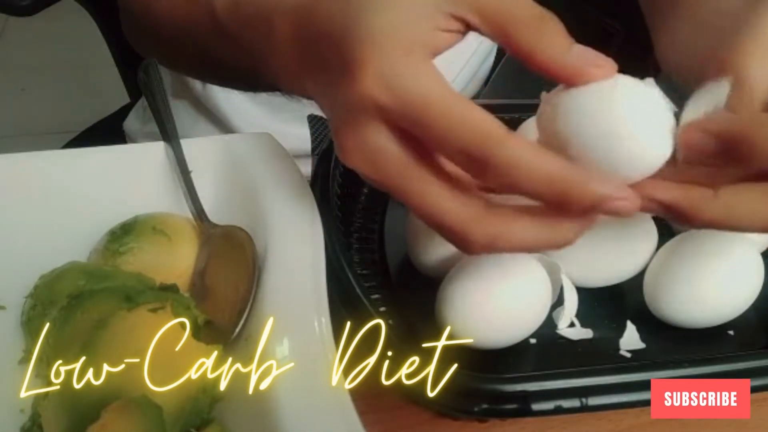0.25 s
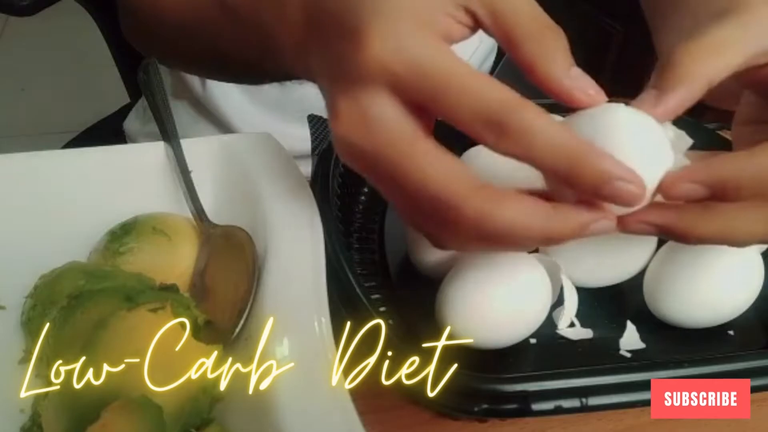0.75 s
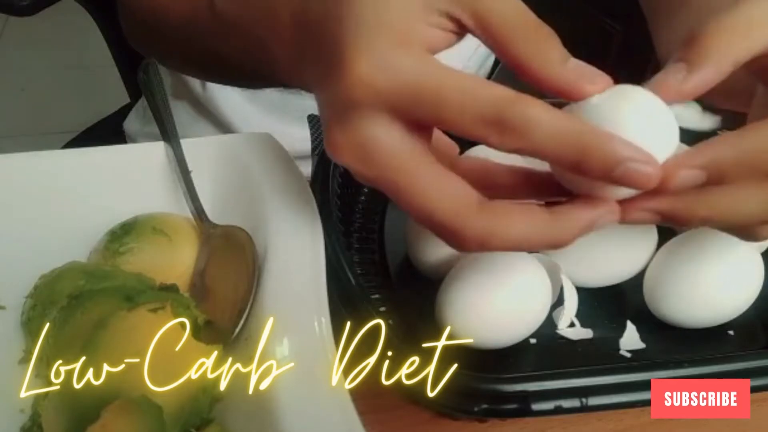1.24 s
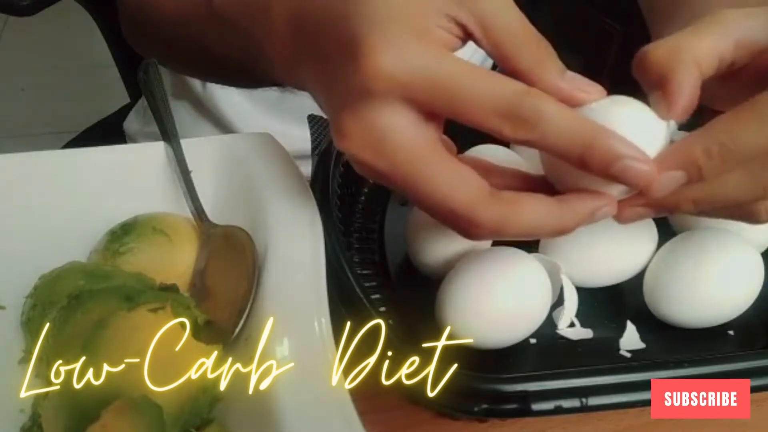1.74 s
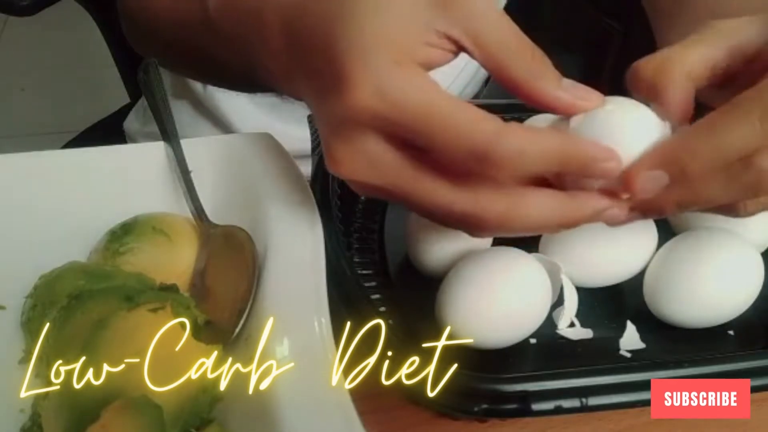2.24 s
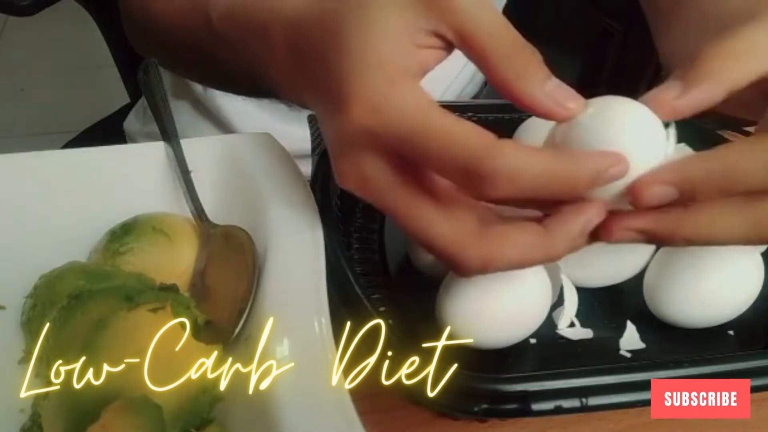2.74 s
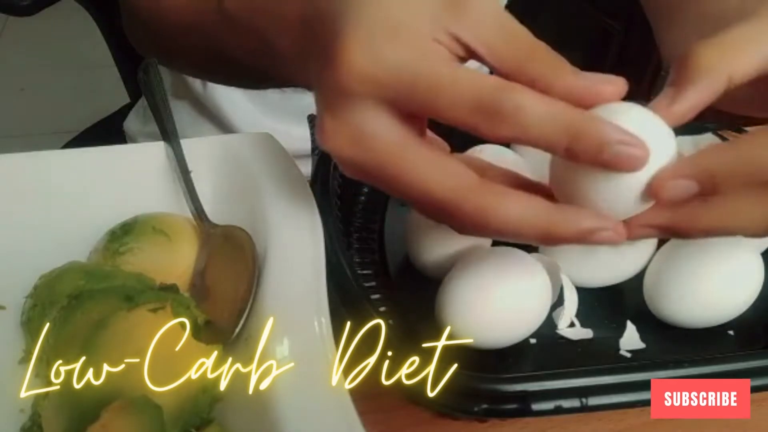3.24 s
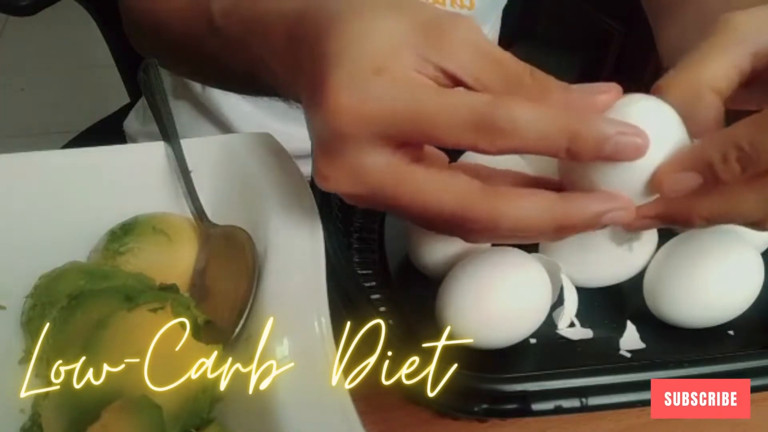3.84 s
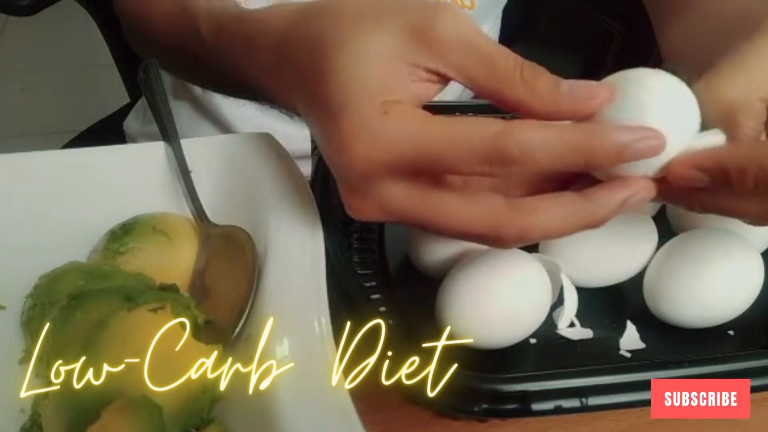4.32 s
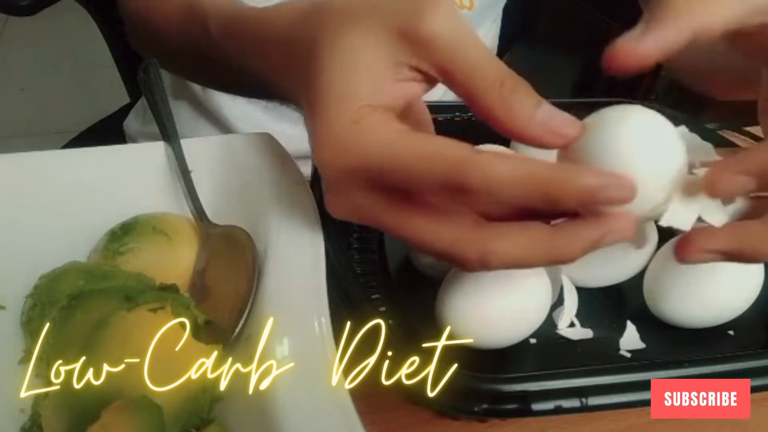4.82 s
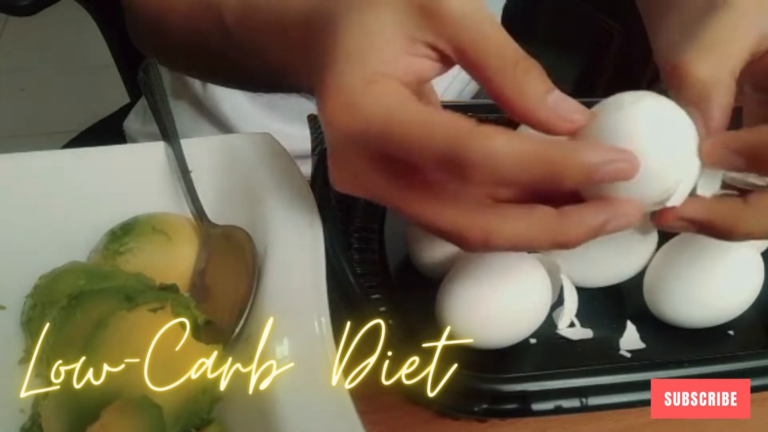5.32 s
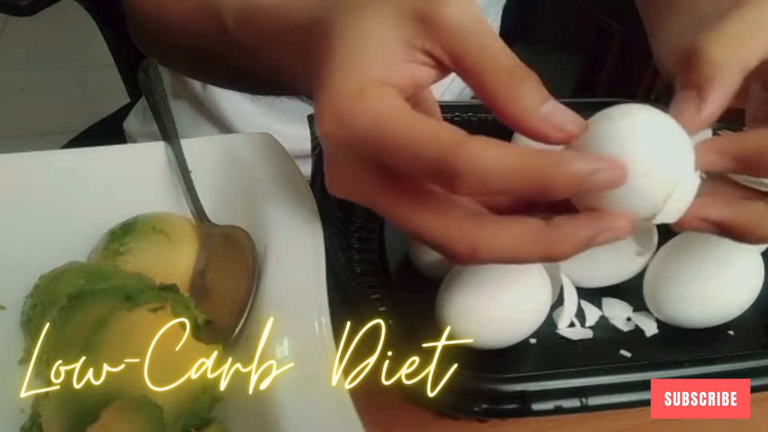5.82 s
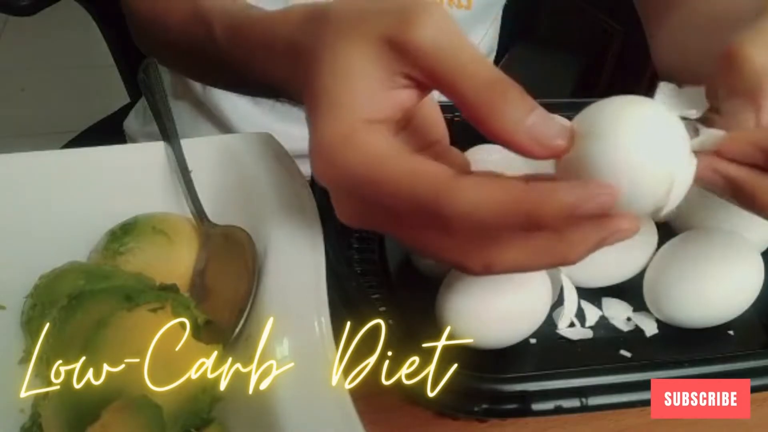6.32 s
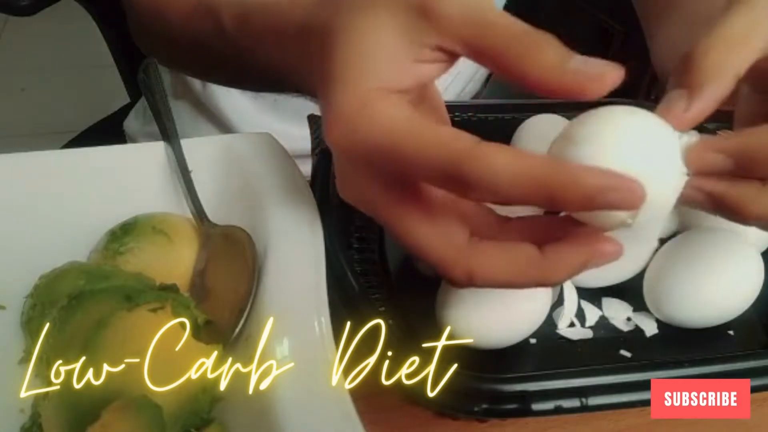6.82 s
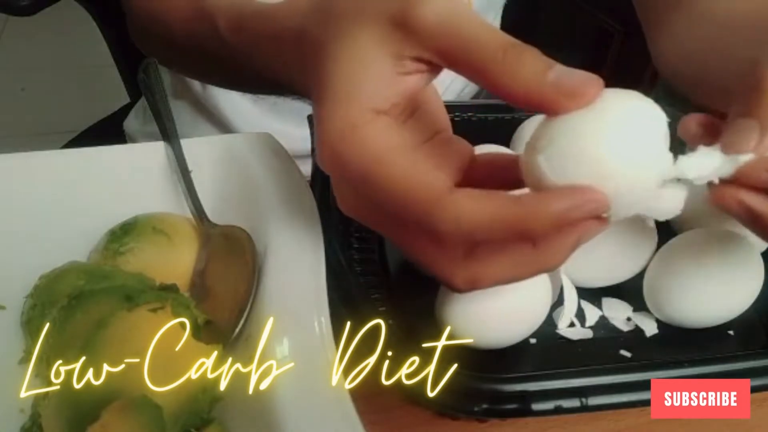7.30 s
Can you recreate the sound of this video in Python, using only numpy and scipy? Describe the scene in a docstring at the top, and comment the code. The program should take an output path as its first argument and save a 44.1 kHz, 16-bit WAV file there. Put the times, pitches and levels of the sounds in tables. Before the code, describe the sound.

Brittle eggshell snaps and tiny tearing crackles close up over a low room hum, with two bouncing clatters of shell pieces on a plastic tray.

```python
"""Fine snaps and crackles come first, over a low hum: fingers peel a hard-boiled egg close to a phone.
Noise bursts ring the shell for each snap; dense tiny clicks make the tearing, the rips and soft rubbing.
Twice a handful of pieces drops and bounces on a plastic tray: short hollow knocks, shell ticks and crumbs.
Shaped noise makes the air and the wavering rumble of the small room, and two thin tones whine in the hum."""
import sys
import numpy as np
from scipy import signal
from scipy.fft import rfft, irfft
from scipy.io import wavfile
from scipy.ndimage import uniform_filter1d

SR = 44100
rng = np.random.default_rng(int(sys.argv[2]) if len(sys.argv) > 2 else 0)


def persist_wave(psi):
    """Save psi, clipped to +-1, as 16-bit WAV."""
    counts = np.round(np.clip(psi, -1, 1) * 32767).astype(np.int16)
    wavfile.write(sys.argv[1], SR, np.atleast_2d(counts).T)


N = 333396  # length [samples]

# shell snaps; deeper fractures sound duller: (time [s], level [dB], depth [dB])
SNAPS = [(0.105, -59, -6), (0.2886, -53, -12), (0.307, -50.5, -9), (0.3414, -49, 2), (0.3485, -44.5, 0),
         (0.5097, -55.5, 5), (0.751, -37.5, 13.5), (0.7956, -46.5, 10.5), (0.851, -56, 8),
         (0.9437, -48.5, 7), (1.126, -52, 5), (1.263, -57, -6), (1.3274, -61, -4), (1.5805, -48, -2),
         (1.6245, -39.5, 6), (1.6331, -34.5, -3.5), (1.7638, -50.5, 16), (2.2968, -58.5, 10.5),
         (2.3261, -57, 5), (2.4717, -58.5, 10), (2.832, -46, -10), (2.8812, -33, -2), (2.9053, -42, -10),
         (2.9452, -41, -12), (3.0764, -29.5, -1.5), (3.0907, -33, -6), (3.1024, -43, -2),
         (3.1108, -30.5, 0.5), (3.1223, -39.5, -1), (3.139, -44, -4), (3.2345, -56, 4), (3.316, -39, 4),
         (3.5156, -46.5, 1), (3.6566, -53.5, 12), (3.7658, -49, 5), (3.7794, -50, -5), (3.8202, -52.5, 7),
         (3.838, -51.5, -1), (3.8788, -54, 6), (3.8904, -54, 8), (3.922, -54, 7.5), (3.9888, -48.5, -8),
         (4.0018, -50.5, -2), (4.0258, -49.5, 9), (4.1609, -58.5, -5), (4.25, -46, -8), (4.4924, -51, 1),
         (4.5491, -52.5, 7), (4.6159, -57, 3), (5.2225, -55.5, 0), (5.2753, -53, -1), (5.311, -54.5, 0),
         (5.3877, -62, 3), (5.451, -59, 6), (5.686, -56, 2.5), (5.7533, -60, 2), (5.8593, -52.5, -4),
         (5.9389, -54, -5), (6.201, -56, -2), (6.304, -51, 6.5), (6.3716, -53, -4), (6.4243, -58.5, 4),
         (6.4484, -54.5, 6), (6.8678, -56.5, -2)]
# pieces landing on the tray: (time [s], level [dB], knock pitch [Hz], brittle tick against knock [dB])
DROPS = [(4.9028, -12.5, 1730, -11), (4.906, -12, 1720, -16), (4.924, -9.5, 2260, -19),
         (4.929, -7, 1670, -11), (4.941, -16.5, 2580, -9), (4.946, -25, 2330, -8),
         (4.964, -26.5, 2220, -1.5), (4.972, -28, 2250, -12), (4.979, -29, 2430, -12.5),
         (5, -41.5, 2430, 5), (5.013, -25.5, 2260, -14), (5.016, -29, 2220, -2), (5.025, -30.5, 2340, -22),
         (7.127, -7.5, 1775, -14.5), (7.131, -12.5, 1575, -15.5), (7.140, -24, 2350, -15),
         (7.153, -25, 1670, -16), (7.166, -25, 2300, -10.5), (7.1678, -9.5, 2350, -18.5),
         (7.2074, -4, 2240, -12), (7.21, -15, 1930, -17), (7.221, -26, 1840, -2.5), (7.258, -20, 2060, -3),
         (7.2759, -9.5, 2060, -10.5), (7.280, -4.5, 2090, -20), (7.288, -22, 2630, -2),
         (7.329, -22, 2240, -1), (7.350, -30.5, 1500, -6), (7.365, -40, 1730, 6)]
# fine crackle while the membrane tears: (time [s], level [dB])
TEARING = [(0, -83), (1.2, -88), (1.8, -85), (2.6, -91), (2.9, -76), (3.2, -89), (3.35, -70.5),
           (3.85, -78.5), (4.3, -89.5), (4.62, -83.5), (5.3, -82.5), (5.6, -91.5), (6.3, -83), (6.7, -87),
           (7.56, -89)]
# strips of shell ripping away: (time [s], length [s], level [dB], lower shell modes against upper [dB])
RIPS = [(0.324, 0.066, -61, -8), (0.746, 0.026, -64, 10), (0.796, 0.032, -69, 10.5),
        (.95, 0.071, -65.5, -8), (1.102, 0.056, -63, 0), (1.24, 0.048, -67, -7), (1.548, 0.15, -65.5, -11),
        (1.628, 0.089, -51.5, -3), (1.758, 0.043, -55.5, -5), (1.882, 0.08, -73, -1),
        (2.004, 0.031, -63.5, 4), (2.048, .06, -75, 3), (2.888, .06, -57, -21), (3.288, 0.017, -46, -1.5),
        (3.326, 0.11, -57.5, -7), (3.432, 0.14, -64, 0.5), (3.677, 0.044, -64.5, -1),
        (3.747, 0.072, -63.5, -3), (4.463, 0.025, -57, -6.5), (4.659, 0.022, -67, 1),
        (4.681, 0.018, -56, -7), (4.711, .03, -64, 1), (4.74, 0.058, -72.5, 7), (6.216, 0.026, -69, -2),
        (6.297, 0.026, -66, 0), (6.917, 0.06, -74, -14)]
# strokes of fingers and loose shell rubbing on the egg: (time [s], length [s], level [dB])
RUBBING = [(3.42, 0.17, -68), (3.58, 0.19, -64.5), (4.5, 0.15, -62.5), (4.603, 0.17, -67),
           (4.735, 0.08, -54.5), (4.811, 0.096, -59.5), (6.248, 0.11, -73)]
# lower modes (ways of ringing) of the shell on the egg: (pitch [Hz], width [Hz], level [dB])
SHELL_LOW_MODES = [(3573, 490, -9), (4686, 820, 4), (5125, 530, 3)]
# upper modes of the shell on the egg: (pitch [Hz], width [Hz], level [dB])
SHELL_HIGH_MODES = [(5770, 510, -3.5), (6650, 550, 0), (7175, 920, 1.5)]
# modes of a loose piece of shell: (pitch [Hz], width [Hz], level [dB])
PIECE_MODES = [(3520, 1500, -4.5), (4310, 790, -0.5), (4700, 800, 0), (5780, 790, -2.5), (6220, 1200, -6),
               (6920, 550, -11)]
# modes of the plastic tray: (pitch [Hz], width [Hz], level [dB])
TRAY_MODES = [(198, 79, -2), (341, 133, 1), (681, 90, 10), (1097, 69, 13), (1700, 775, 11),
              (2075, 500, -13), (2820, 715, -21), (3350, 204, -5.5)]
# broad bands that colour the rubbing: (pitch [Hz], width [Hz], level [dB])
RUB_BANDS = [(804, 1000, 8.5), (1400, 1100, 7), (2230, 900, -4.5), (2950, 2200, -26), (4700, 840, -5.5)]
# relative spectrum of the air noise: (pitch [Hz], level per Hz [dB])
AIR_SPECTRUM = [(76, -22.5), (130, 1), (160, -12.5), (243, -1.5), (290, -11.5), (460, -12.5), (580, -19.5),
                (760, -17), (1700, -16), (2300, -23), (3500, -37), (4800, -34.5), (6000, -42.5),
                (8200, -43.5)]
# air noise gathered in the low modes of the room: (pitch [Hz], width [Hz], level [dB])
HUM_MODES = [(77.8, 9, -62.5), (109.3, 5.5, -61.5), (128.5, 6.5, -68), (169.5, 8.2, -73), (234.8, 13, -70),
             (257.2, 14.6, -67.5), (732, 47, -78)]
# two thin tones within the hum: (average pitch [Hz], level [dB])
WHINE_TONES = [(719, -82), (742, -78.5)]
# slow wavering of the deepest hum: (time [s], level [dB])
RUMBLE_LEVEL = [(0.0, -56), (0.25, -55), (0.36, -48), (1.2, -48.5), (2.3, -51), (2.9, -47.5), (4.3, -50),
                (5.3, -50), (5.9, -54.5), (6.9, -54), (7.05, -49), (7.3, -48), (7.56, -55.5)]
# relative spectrum of the rumble before it is steadied: (pitch [Hz], level per Hz [dB])
RUMBLE_BAND = [(20, -20.5), (30, -20.5), (36, -2), (48, 1), (54, -5.5), (63, -22), (90, -66)]
# reshaping of the steadied rumble: (pitch [Hz], gain [dB])
RUMBLE_EDGES = [(20, -6), (31, -15), (37, -2), (55, 1), (62, -16), (90, -34.5)]
# reflections from table, hands and walls: (approximate delay [s], level in each tail [dB])
ECHOES = [(.0025, -10), (.0047, -16), (.009, -18), (.012, -18), (.017, -25.5), (.024, -32)]
# time for the room tail to fall by 60 dB: (pitch [Hz], time [s])
ROOM_DECAY = [(500, 0.27), (2000, 0.29), (3500, 0.28), (6000, 0.31), (8000, 0.32)]

# lower shell modes and dull knock against the upper modes, at depth 0 [dB]
LOW_DB, KNOCK_DB = -4.5, -9.5
LOW_PER_DEPTH, KNOCK_PER_DEPTH = 0.68, 1.21  # gain for each dB of depth [dB]
# small snaps at chance moments: how many, mean level, its spread, spread of depth [dB]
FAINT_COUNT, FAINT_DB, FAINT_SPREAD_DB, FAINT_DEPTH_DB = 8, -63, 4, 5.5
TEARING_LOW_DB = -0.6  # lower shell modes against upper [dB]
TRAY_DB = -13  # ring of the tray against the knock [dB]
# crumbs after each landing: gain [dB], decay time [s], tray ring against shell [dB]
CRUMBS_DB, CRUMBS_S, CRUMBS_TRAY_DB = -9.5, 0.022, -5.5
# a stroke peaks at this share of its length; its ends are softer [dB], before a short fade
RUB_PEAK, RUB_ENDS_DB = 0.51, -12
AIR_DB = -60  # level of the air noise [dB]
WAVER_DB, WAVER_S = 2, 0.1  # quicker chance wavering of the rumble: typical size [dB], time scale [s]
EDGE_HZ, TOP_HZ = 8080, 15500  # main band limit of the phone, and end of the faint trace above it [Hz]


def snaps():
    """Each fracture rings the shell and runs on in smaller splits; deeper ones also knock the egg harder."""
    out, size = np.zeros(N), 3000
    moments = rng.random(FAINT_COUNT)
    chances = rng.standard_normal((FAINT_COUNT, 2))
    faint = [(u * N / SR, FAINT_DB + FAINT_SPREAD_DB * a, FAINT_DEPTH_DB * b)
             for u, (a, b) in zip(moments, chances)]
    rows = SNAPS + faint
    noises = rng.standard_normal((len(rows), size))
    splits = grains(noises.shape, per_s=240, spread_db=3.5)
    for (s, db, depth), noise, split in zip(rows, noises, splits):
        blow = burst(noise, rise=0.00072, fall=0.0011)
        blow += gain_of(-22.5) * burst(split, rise=0.0025, fall=0.0076)
        high = topped(ring(blow, SHELL_HIGH_MODES))
        low = gain_of(LOW_DB + LOW_PER_DEPTH * depth) * topped(ring(blow, SHELL_LOW_MODES))
        knock = topped(ring(blow, [(2200, 2500, 0)]))
        knock *= gain_of(KNOCK_DB + KNOCK_PER_DEPTH * depth)
        add(out, s, gain_of(db) * (high + low + knock))
    return out


def peeling():
    """Many tiny fractures ring the upper and lower shell modes: a faint crackle and short, dense rips."""
    upper = gain_of(along(TEARING)) * evened(grains(N, per_s=500, spread_db=5.5))
    lower = gain_of(along(TEARING) + TEARING_LOW_DB) * evened(grains(N, per_s=500, spread_db=5.5))
    dense_upper = evened(grains(N, per_s=1500, spread_db=4.0))
    dense_lower = evened(grains(N, per_s=1500, spread_db=4.0))
    for s, length, db, low_db in RIPS:
        u = np.linspace(0, 1, max(round(length * SR), 2))
        swell = gain_of(db) * np.minimum(u / 0.23, 1) * (1 - u ** 1.04)  # rises quickly, then lets go
        start = round(s * SR)
        at = slice(start, start + len(u))
        add(upper, s, swell * dense_upper[at])
        add(lower, s, gain_of(low_db) * swell * dense_lower[at])
    return ring_evenly(upper, SHELL_HIGH_MODES) + ring_evenly(lower, SHELL_LOW_MODES)


def drops():
    """A hollow knock whose pitch depends on the piece, the ring of the tray, a shell tick, then crumbs."""
    out = np.zeros(N)
    crumbs = grains((len(DROPS), 6000), per_s=300, spread_db=4.5)
    noises = rng.standard_normal((len(DROPS), 3000))
    for (s, db, hz, tick_db), noise, crumb in zip(DROPS, noises, crumbs):
        skitter = burst(crumb, rise=0.0044, fall=CRUMBS_S)
        skitter = ring(skitter, PIECE_MODES) + gain_of(CRUMBS_TRAY_DB) * ring(skitter, TRAY_MODES)
        add(out, s, gain_of(db + CRUMBS_DB) * skitter)
        blow = burst(0.24 * noise + 1, rise=0.00005, fall=0.00008)
        knock = topped(ring(blow, [(hz, 1100, 0), (hz, 260, 2), (1.314 * hz, 1000, -8)]))
        knock += gain_of(TRAY_DB) * topped(ring(blow, TRAY_MODES))
        tick = ring(burst(noise, rise=0.00013, fall=0.001), PIECE_MODES)
        add(out, s, gain_of(db) * (topped(knock) + gain_of(tick_db) * topped(tick)))
    return out


def rubbing():
    """Dense slips under the fingertips, dull and soft; each stroke swells and fades."""
    slips = evened(ring(grains(N, per_s=1400, spread_db=3.5), RUB_BANDS))
    out = np.zeros(N)
    for s, length, db in RUBBING:
        u = np.linspace(0, 1, round(length * SR))
        swell_db = np.interp(u, [0, RUB_PEAK, 1], [RUB_ENDS_DB, 0, RUB_ENDS_DB])
        stroke = gain_of(db + swell_db) * signal.windows.tukey(len(u), 0.2)
        add(out, s, stroke * slips[round(s * SR):][:len(u)])
    return out


def hum():
    """Broad air noise, the fuzzy low tones it excites in the room, a thin whine and the rumble."""
    air = gain_of(AIR_DB) * coloured(rng.standard_normal(N), AIR_SPECTRUM)
    tones = sum(gain_of(db) * evened(ring(rng.standard_normal(N), [(hz, width, 0)]))
                for hz, width, db in HUM_MODES)
    return air + tones + whine() + rumble()


def whine():
    """Two thin sine tones whose pitches drift slightly together."""
    drift = 1.6 * evened(uniform_filter1d(rng.standard_normal(N), SR // 4))  # [Hz]
    return sum(gain_of(db) * np.sin(2 * np.pi * np.cumsum(hz + drift) / SR) for hz, db in WHINE_TONES)


def rumble():
    """Very low noise whose level wavers both slowly and quickly."""
    deep = signal.hilbert(coloured(rng.standard_normal(N), RUMBLE_BAND))
    steadied = (deep / abs(deep) ** 0.5).real  # halves the level swings of plain noise in dB
    steadied = coloured(steadied, RUMBLE_EDGES)
    span = round(WAVER_S * SR)
    quick = uniform_filter1d(uniform_filter1d(rng.standard_normal(N), span), span)
    waver = WAVER_DB * evened(quick - uniform_filter1d(quick, 4 * span))  # without slow drift
    return gain_of(along(RUMBLE_LEVEL) + waver) * steadied


def room(x, wet_db, turns_per_s=9):
    """No two sounds start at quite the same spot, so they pass in turn through three unlike tails."""
    turn = np.pi * turns_per_s * np.arange(N) / SR
    out = x.copy()
    for k in range(3):
        share = np.sqrt(2 / 3) * abs(np.cos(turn + k * np.pi / 3))  # the three powers add up to 1
        out += signal.fftconvolve(x * share, tail(wet_db))[:N]
    return out


def tail(wet_db):
    """A few near reflections, and sparse taps whose bands die at their own speed."""
    size = SR // 2
    taps = np.zeros(size)
    at = np.arange(200, size - 30, 30)  # one tap at a chance place in every 30 samples
    taps[at + rng.integers(0, high=30, size=len(at))] = rng.choice([-1., 1.], len(at))
    hz, t, bands = signal.stft(taps, SR, nperseg=256)
    fade = gain_of(-60 * t / read(ROOM_DECAY, hz)[:, None])
    out = signal.istft(bands * fade, SR, nperseg=256)[1][:size]
    out *= gain_of(wet_db) / np.linalg.norm(out)
    for s, db in ECHOES:
        out[round(s * SR * rng.uniform(0.9, 1.1))] += rng.choice([-1, 1]) * gain_of(db)
    return out


def grains(count, per_s, spread_db):
    """Sparse clicks of random sign and unlike size."""
    size = gain_of(spread_db * np.minimum(rng.exponential(1, count), 4))
    present = rng.random(count) < per_s / SR
    return size * present * rng.choice([-1, 1], count)


def burst(noise, rise, fall):
    """A fracture or impact: a quick run of tiny blows that rises and dies away (times in s)."""
    t = np.arange(len(noise)) / SR
    return noise * (1 - np.exp(-t / rise)) * np.exp(-t / fall)


def resonate(x, hz, width):
    """One mode, a resonance with a gain near 1 at its centre."""
    r = np.exp(-np.pi * width / SR)
    feedback = [1, -2 * r * np.cos(2 * np.pi * hz / SR), r * r]
    return (1 - r * r) / 2 * signal.lfilter([1, 0, -1], feedback, x)


def ring(x, modes):
    """Sum of the modes of a body, each applied twice for steep flanks."""
    return sum(gain_of(db) * resonate(resonate(x, hz, width), hz, width) for hz, width, db in modes)


def ring_evenly(x, modes):
    """Ring a body, scaled so that a single click would come out with unit energy."""
    click = signal.unit_impulse(2000)
    return ring(x, modes) / np.linalg.norm(ring(click, modes))


def coloured(noise, spectrum):
    """Shape noise with a spectrum, then bring its average strength (RMS) to 1."""
    gain = gain_of(read(spectrum, np.fft.rfftfreq(N, 1 / SR)))
    return evened(irfft(rfft(noise) * gain, N))


def gain_of(db):
    """Turn dB into a plain factor."""
    return 10 ** (np.asarray(db) / 20)


def evened(x):
    """Bring the average strength (RMS) to 1."""
    return x / np.sqrt(np.mean(x ** 2) + 1e-20)


def topped(x):
    """Bring the highest peak to 1."""
    return x / abs(x).max()


def read(points, hz):
    """Read a table between its points, on a logarithmic pitch scale."""
    f, value = np.transpose(points)
    return np.interp(np.log(hz + 1), np.log(f + 1), value)


def along(curve):
    """Draw a table as straight lines over the whole scene."""
    s, value = np.transpose(curve)
    return np.interp(np.arange(N) / SR, s, value)


def add(mix, s, sound):
    """Add a sound at time s, cut off at the end of the mix."""
    part = mix[round(s * SR):][:len(sound)]
    part += sound[:len(part)]


def scene():
    """The egg in the hands and the tray each get a room tail; the hum is added as it is."""
    near = room(snaps() + peeling() + rubbing(), wet_db=-9.0)  # in the hands, close to the phone
    tray = room(drops(), wet_db=-12.0)
    return (near + tray + hum())[None]


def record(dry):
    """The band limit of the phone lets a trace of the sharpest clicks through, over a faint hiss."""
    edge = signal.firwin(141, EDGE_HZ, window=("kaiser", 6), fs=SR)
    trace = signal.firwin(141, TOP_HZ, window=("kaiser", 6), fs=SR) - edge  # only the band above the edge
    heard = signal.oaconvolve(dry, (edge + gain_of(-25) * trace)[None], "same")
    hiss = gain_of(-101) * rng.standard_normal(dry.shape)
    return heard + hiss


dry = scene()
out = record(dry)
persist_wave(out)
```